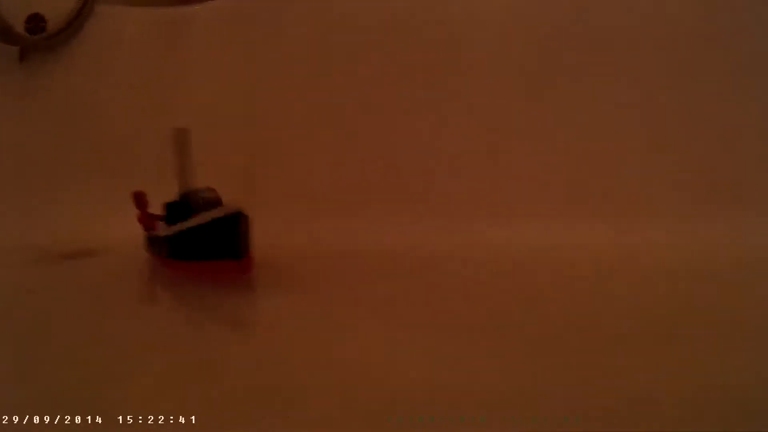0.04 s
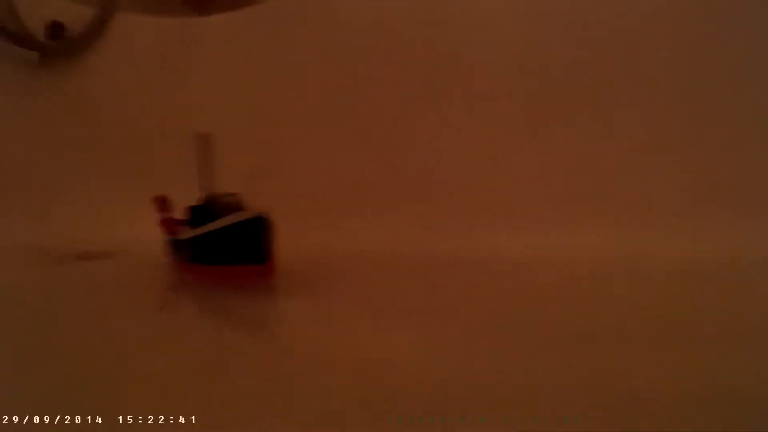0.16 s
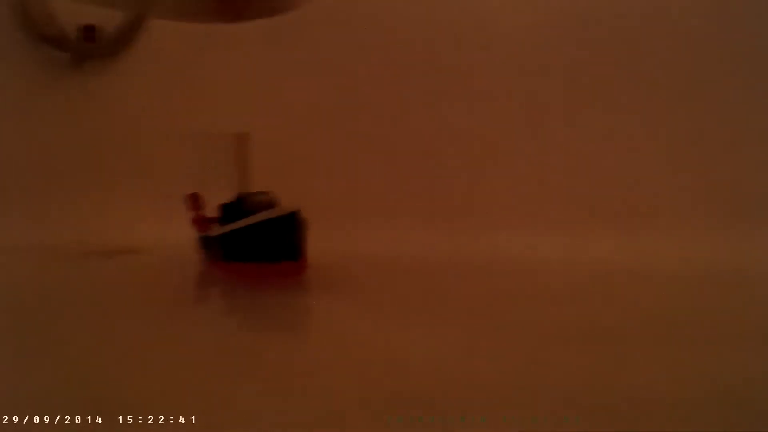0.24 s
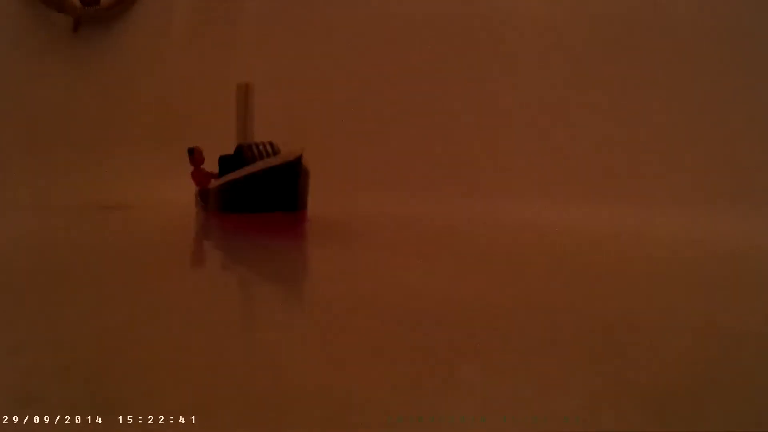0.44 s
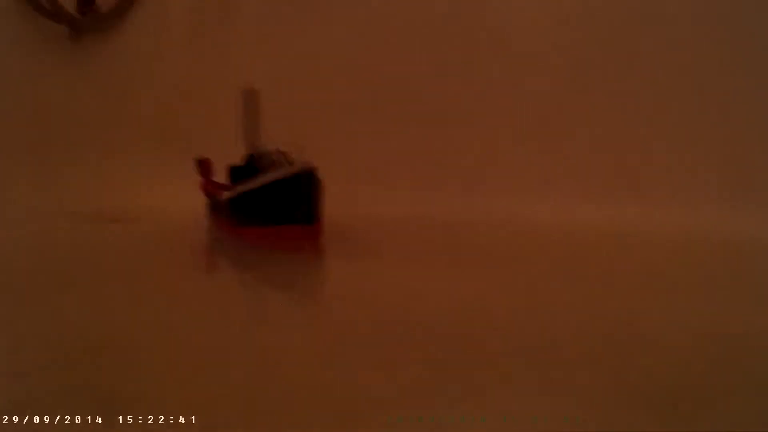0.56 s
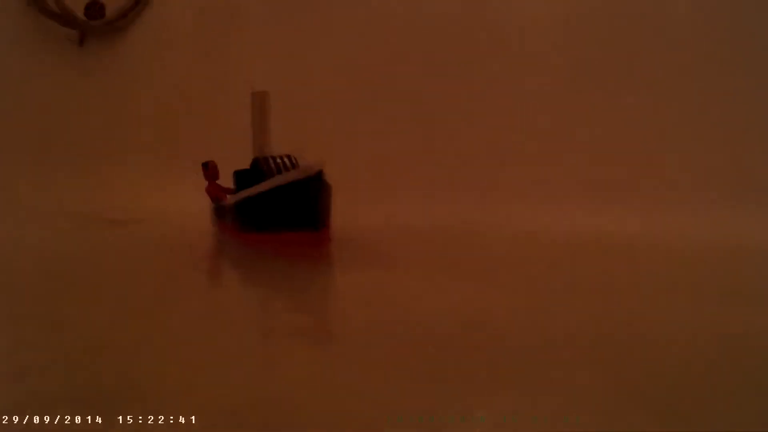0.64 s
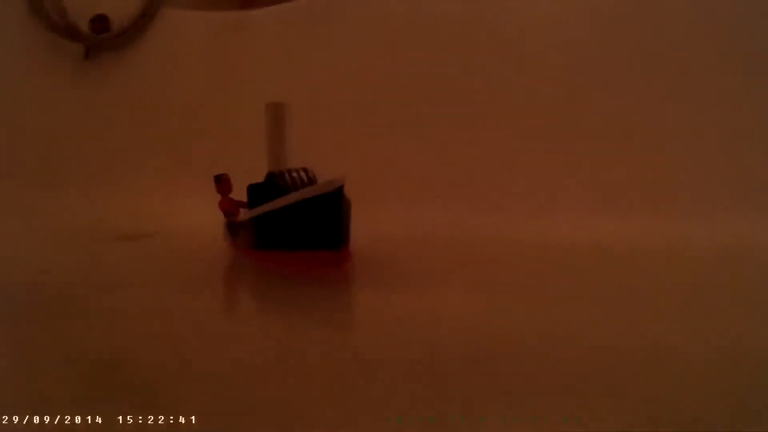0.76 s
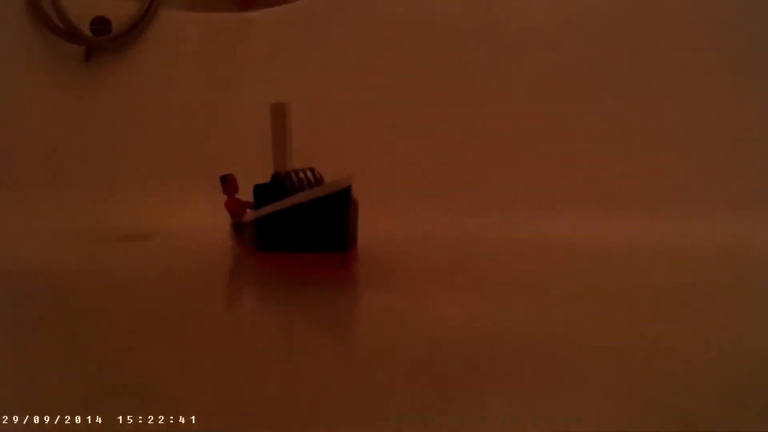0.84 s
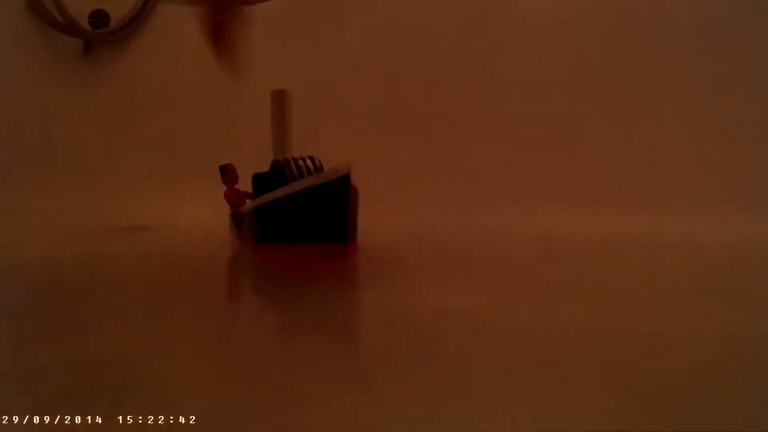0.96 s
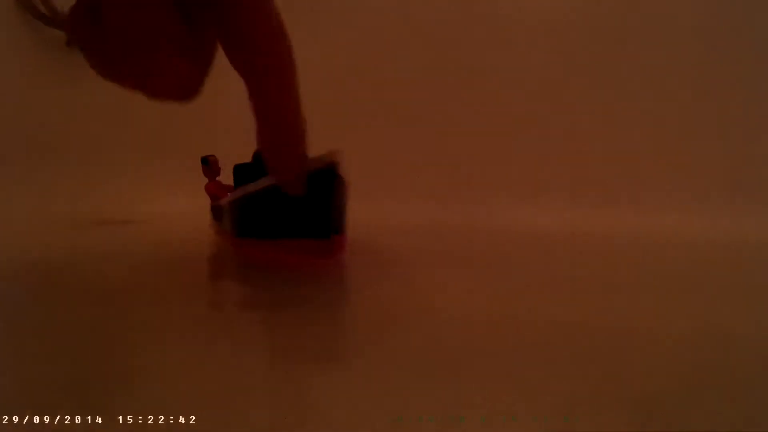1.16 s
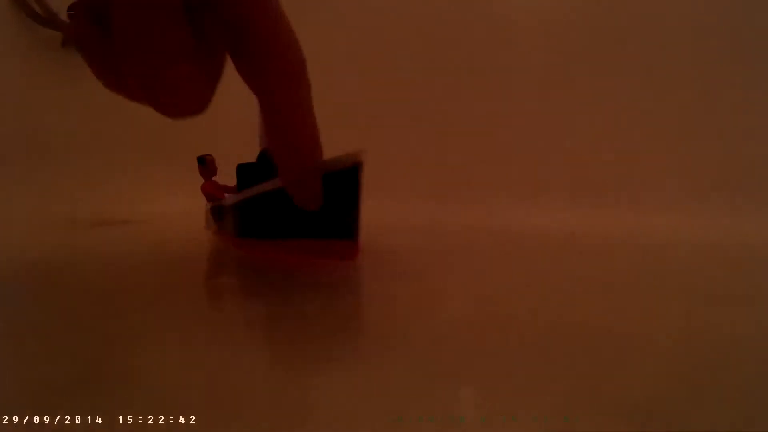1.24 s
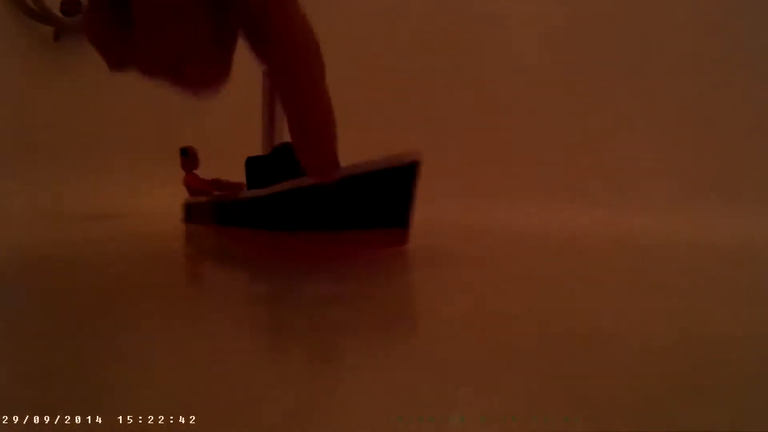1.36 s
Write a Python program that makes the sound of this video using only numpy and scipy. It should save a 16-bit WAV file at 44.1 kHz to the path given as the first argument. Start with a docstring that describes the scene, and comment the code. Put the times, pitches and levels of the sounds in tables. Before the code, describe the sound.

A small water plip and light ticks from a toy boat rocking, over faint hiss.

```python
"""Toy boat on still water

A small plastic boat rocks in a quiet room. Light contacts excite the damped modes of its hull, heard
as ticks and one soft bump. A bubble oscillates for a few cycles in a sharp plip, reflected by the
basin, amid a faint swish and gurgle. Air rumble, a low wash, hiss and a pulsing whine lie underneath."""
import sys
import numpy as np
from scipy import signal
from scipy.fft import rfft, irfft
from scipy.io import wavfile

SR = 44100
rng = np.random.default_rng(int(sys.argv[2]) if len(sys.argv) > 2 else 0)


def wav_out(sig):
    """Save sig, one row per channel (or a flat mono array), as 16-bit PCM at SR to the path in sys.argv[1]."""
    wavfile.write(sys.argv[1], SR, np.round(np.clip(np.atleast_2d(sig).T, -1, 1) * 32767).astype(np.int16))


N = 61739
T = np.arange(N) / SR

# Modes of the hull. Each row: frequency in Hz, level in dB, 60 dB decay time in seconds.
HULL_MODES = [(1353, -4.5, 0.021), (1740, -14, 0.021), (2150, -12, 0.013), (2920, -7, 0.0076),
              (3718, -3, .014), (4010, -4.5, 0.0086), (4560, -2.5, 0.0092), (5420, -4.5, .012),
              (5900, -14.5, 0.011), (6540, -6, .006)]
# Contacts on the hull. Each row: start in seconds, level in dB, then the relative levels in dB
# of the low modes, the middle modes, the top modes and the snap.
HULL_CONTACTS = [(.2262, -44.5, -1.5, -1, -20, 14.5), (0.2271, -38.5, 4.5, 4, -17, -6),
                 (0.2964, -45, 1, -13, -12, 0), (0.3377, -30, -35, -16, -1, -7),
                 (0.3387, -41, 13, -5, -1, -4), (.4660, -52, 17, 11, -11, -6),
                 (.7030, -58, 12, -12, -10, -4), (0.7502, -35.5, -2.5, 1.5, -7, -2),
                 (.7520, -52.5, 14, -9, -6, -6), (1.2250, -45, 0, 5.5, -9, -6),
                 (1.2284, -51, 3, 5, -12, -6), (1.3437, -55, -3, 13, -12, -4),
                 (1.3520, -62.5, 10.5, 0, -12, -6)]
def tick(s, db, low_db, middle_db, top_db, snap_db):
    """Modal superposition: an impact rings the hull's modes, weighted by the spot that is struck."""
    force = from_db(db) * lowpass(click(s), hz=8500)
    sound = from_db(snap_db) * force
    for k, (hz, mode_db, t60) in enumerate(HULL_MODES):
        spot_db = low_db if hz < 2500 else middle_db if hz < 3350 else top_db if hz > 4400 else 0
        scatter_db = 1.07 * rng.standard_normal()
        sound += (-1) ** k * ring(force, hz, t60) * from_db(mode_db + spot_db + scatter_db)
    return sound


BODY_HZ, BODY_T60_S = 533, .025  # the hull's dull note
# Two pushes heard as one bump. Each row: start in seconds, push level in dB, ring level in dB.
SOFT_PUSHES = [(0.3259, -39, -52), (.3340, -30, -30.5)]
def bump(s, push_db, ring_db, push_rise_s=.0008, ring_hz=1303):
    """Soft impact: a smooth force pulse carries little treble, so the hull sounds only low notes."""
    age = T - s
    body = from_db(-8) * ring(click(s + push_rise_s / 2), BODY_HZ, BODY_T60_S)
    push = swell(age, push_rise_s) + body
    ringing = swell(age, rise_s=.0016) * np.cos(2 * np.pi * ring_hz * age)
    return from_db(push_db) * push + from_db(ring_db) * ringing


def bubble(s, width_s, hz=1440, glide_hz_per_s=55000):
    """Bubble resonance: a few cycles, rising in pitch, under a Gaussian envelope centred on time s."""
    age = T - s
    envelope = np.exp(-.5 * (age / width_s) ** 2)
    return envelope * np.cos(2 * np.pi * (hz + .5 * glide_hz_per_s * age) * age)


# Echoes from the basin. Each row: delay in seconds, relative level in dB, Gaussian width in seconds.
BASIN_ECHOES = [(.00462, -13, .0014), (.0155, -28, .002), (.0195, -27, .0016)]
def plip(crack_s=.3833, bubble_s=.3854):
    """Reflection: after a tiny crack and the hull's dull note, a bubble sounds and the basin echoes it."""
    crack = tick(crack_s, db=-47, low_db=20.5, middle_db=8.5, top_db=-22, snap_db=-8)
    body = from_db(-42) * ring(click(crack_s), BODY_HZ, BODY_T60_S)
    direct = bubble(bubble_s, width_s=.00102)
    echoes = sum(from_db(db) * bubble(bubble_s + delay, width) for delay, db, width in BASIN_ECHOES)
    return from_db(-16.5) * (direct + echoes) + crack + body


# Envelope of the water along the hull. Each row: time in seconds, level in dB.
SWISH_ENVELOPE = [(0, -85), (.205, -84), (.232, -58), (.258, -58), (.28, -65.5), (.305, -58), (.355, -56),
                  (.385, -52.5), (.42, -63.5), (.44, -57), (.462, -47), (.49, -54.5), (.52, -70.5),
                  (.7, -75.5), (.85, -82), (1.22, -75), (1.24, -59.5), (1.275, -82), (1.4, -76.5)]
# Its resonances. Each row: frequency in Hz, relative level in dB, 60 dB decay time in seconds.
SWISH_RESONANCES = [(1294, -3.5, 0.025), (1510, -4.5, 0.007), (1679, 6, 0.017), (2250, -13, 0.0039)]
def swish(splashes_per_s=2300):
    """Shot noise: dense, tiny splashes at random times excite a few damped resonances."""
    splashes = rng.standard_normal(N) * (rng.random(N) < splashes_per_s / SR)
    ringing = sum((-1) ** k * from_db(db) * ring(splashes, hz, t60)
                  for k, (hz, db, t60) in enumerate(SWISH_RESONANCES))
    return level(SWISH_ENVELOPE) * rms_one(ringing)


# Path of a falling resonance. Each row: time in seconds, frequency in Hz, level in dB.
GURGLE_GLIDE = [(.228, 2250, -70), (0.232, 2150, -57), (.239, 2150, -64), (0.246, 2072, -54),
                (.252, 1794, -53), (.261, 1625, -56.5), (.271, 1380, -54), (0.281, 1350, -66)]
def gurgle(half_bandwidth_hz=150):
    """Narrow-band noise: random modulation roughens a tone as it slides down."""
    s, hz, db = np.transpose(GURGLE_GLIDE)
    phase = 2 * np.pi * np.cumsum(np.interp(T, s, hz)) / SR
    in_phase, quadrature = lowpass(rng.standard_normal((2, N)), half_bandwidth_hz)
    envelope = from_db(np.interp(T, s, db)) * (T > s[0]) * (T < s[-1])
    return envelope * rms_one(in_phase * np.cos(phase) + quadrature * np.sin(phase))


def room(x, t60=.058):
    """Reverberation: diffuse reflections form a short, dull tail that decays exponentially."""
    tail = lowpass(rng.standard_normal(N), hz=4300) * from_db(-60 * T / t60)
    return from_db(-18) * signal.fftconvolve(x, tail / np.linalg.norm(tail))[:N]


# Air rumble. Each envelope row: time in seconds, level in dB.
# Each spectrum row: frequency in Hz, relative spectral density in dB.
RUMBLE_ENVELOPE = [(0, -51.5), (.15, -51), (.205, -38.5), (.26, -47.5), (.34, -43), (.42, -43.5),
                   (.5, -33.5), (.57, -44), (.8, -46.5), (.95, -52.5), (1.06, -41), (1.15, -50.5),
                   (1.4, -55)]
RUMBLE_SPECTRUM = [(10, 1), (20, 3.5), (35, -3), (55, -6), (90, -21), (160, -36.5), (400, -56)]
def air_rumble():
    """Amplitude modulation: the deep noise of the air swells and sinks irregularly."""
    return level(RUMBLE_ENVELOPE) * noise(RUMBLE_SPECTRUM)


# Low wash, with rows as for the rumble.
WASH_ENVELOPE = [(0, -61), (.18, -64), (.27, -55.5), (.35, -60.5), (.5, -54.5), (.6, -61), (.9, -60),
                 (1.1, -61), (1.4, -62.5)]
WASH_SPECTRUM = [(40, -24), (100, 3), (230, -3.5), (450, -7.5), (750, -13.5), (1200, -18), (2200, -33),
                 (5000, -29)]
def low_wash():
    """Coloured noise: a spectrum that peaks near 100 Hz is heard as a soft wash."""
    return level(WASH_ENVELOPE) * noise(WASH_SPECTRUM)


# Hiss and its treble band, with rows as for the rumble.
HISS_ENVELOPE = [(0, -69.5), (.2, -68.5), (.28, -63.5), (.35, -62.5), (.45, -64.5), (.53, -62),
                 (.62, -63.5), (.7, -62), (.8, -64), (.9, -68.5), (1.0, -67), (1.11, -65.5), (1.17, -69),
                 (1.26, -67), (1.4, -69)]
HISS_SPECTRUM = [(100, -10), (1000, 1.5), (2200, 0), (3600, 0), (5000, -4), (7000, -9.5), (11000, -15.5),
                 (15800, -23)]
TREBLE_ENVELOPE = [(0, -70.5), (.19, -71.5), (.25, -67.5), (.36, -68.5), (.45, -68), (.53, -65), (.6, -69),
                   (.8, -67.5), (.95, -69), (1.05, -69.5), (1.11, -66.5), (1.17, -70), (1.4, -70.5)]
TREBLE_SPECTRUM = [(3000, -27), (5000, -4), (6500, -0.5), (8500, 1.5), (11000, -1.5), (14000, -5.5),
                   (15800, -13.5)]
def hiss():
    """Incoherent addition: two independent, gently wavering noise bands sum in power."""
    middle = level(HISS_ENVELOPE) * noise(HISS_SPECTRUM)
    treble = level(TREBLE_ENVELOPE) * noise(TREBLE_SPECTRUM)
    return middle + treble


def whine(hz=7933, pulses_per_s=30.27, duty=.56, offset_s=.0199):
    """Periodic gating: a thin electronic tone switches on and off."""
    on = ((T - offset_s) * pulses_per_s) % 1 < duty
    return from_db(-68) * on * np.sin(2 * np.pi * hz * T)


def from_db(db):
    """Decibel scale: 20 dB is a factor of ten in amplitude."""
    return 10 ** (np.asarray(db) / 20)


def rms_one(x):
    """Normalisation to unit RMS."""
    return x / np.sqrt(np.mean(x ** 2) + 1e-20)


def level(rows):
    """Amplitude envelope, interpolated in dB between points in time."""
    return from_db(np.interp(T, *np.transpose(rows)))


def noise(spectrum):
    """Spectral shaping: white noise takes on the given colour, at unit RMS."""
    hz, db = np.transpose(spectrum)
    bins = np.maximum(np.fft.rfftfreq(N, 1 / SR), 1)
    gain = from_db(np.interp(np.log(bins), np.log(hz), db))
    return rms_one(irfft(rfft(rng.standard_normal(N)) * gain, N))


def lowpass(x, hz):
    """Second-order Butterworth low-pass."""
    return signal.sosfilt(signal.butter(2, hz, fs=SR, output="sos"), x + 1e-18)


def click(s):
    """Unit impulse at time s."""
    return 1. * (np.arange(N) == int(s * SR))


def ring(x, hz, t60):
    """Damped oscillator: a unit impulse starts a decaying sine of height 1."""
    r, w = from_db(-60 / (t60 * SR)), 2 * np.pi * hz / SR
    return signal.lfilter([0, np.sin(w)], [1, -2 * r * np.cos(w), r * r], x + 1e-18)


def swell(age, rise_s):
    """Smooth pulse: a rise to 1, then a quick fall."""
    u = np.maximum(age, 0) / rise_s
    return (u * np.exp(1 - u)) ** 2


def scene():
    """Superposition: boat, water and their reverberation add to the background in one channel."""
    background = air_rumble() + low_wash() + hiss() + whine()
    water = swish() + gurgle() + plip()
    hull = sum(bump(*row) for row in SOFT_PUSHES) + sum(tick(*row) for row in HULL_CONTACTS)
    boat = hull + water
    return (boat + room(boat) + background)[None]


def record(dry, cutoff_hz=15800):
    """Band limiting: an elliptic low-pass cuts the highest treble steeply."""
    return signal.sosfilt(signal.ellip(12, .1, 70, cutoff_hz, fs=SR, output="sos"), dry)


dry = scene()
out = record(dry)
wav_out(out)
```